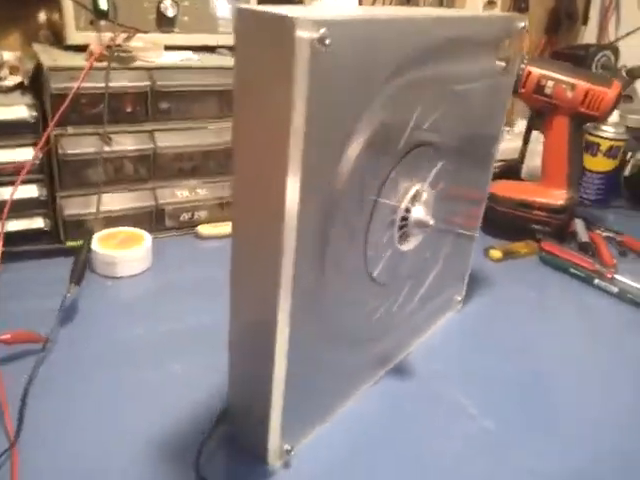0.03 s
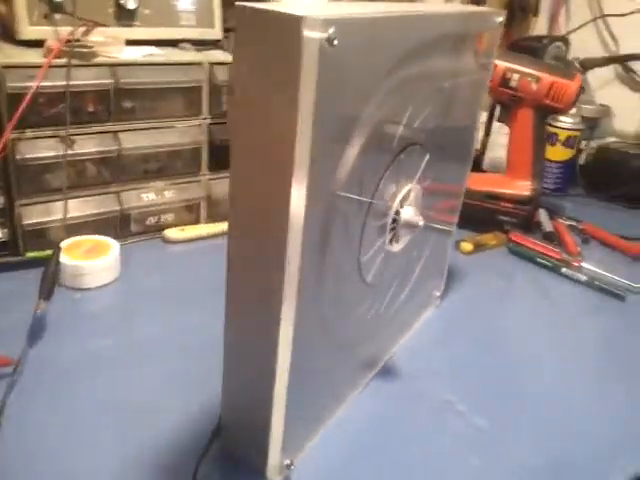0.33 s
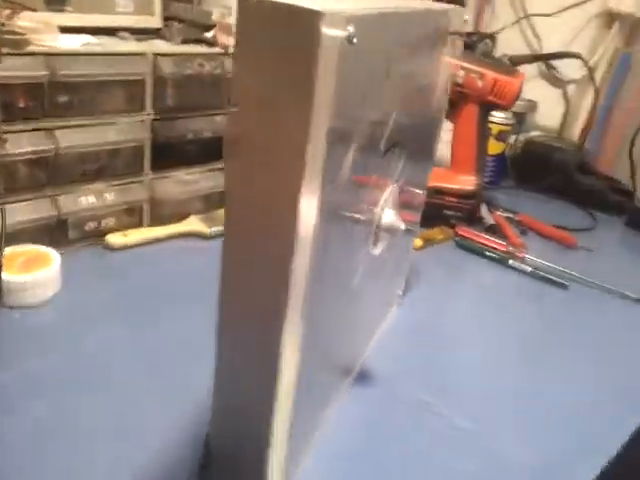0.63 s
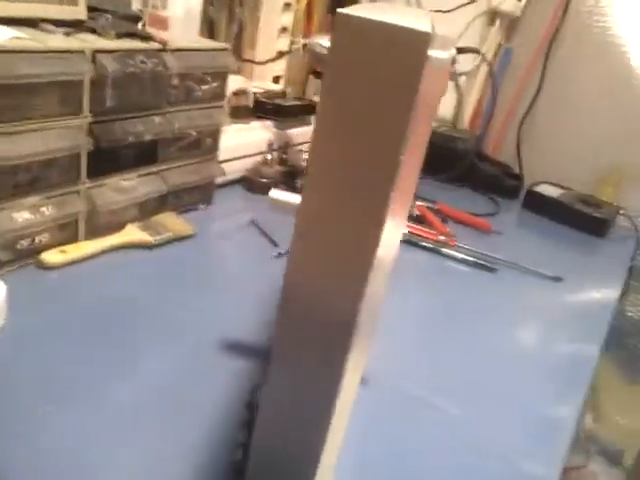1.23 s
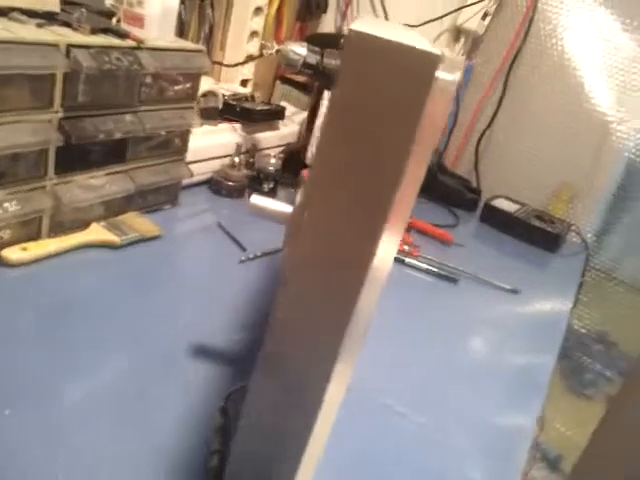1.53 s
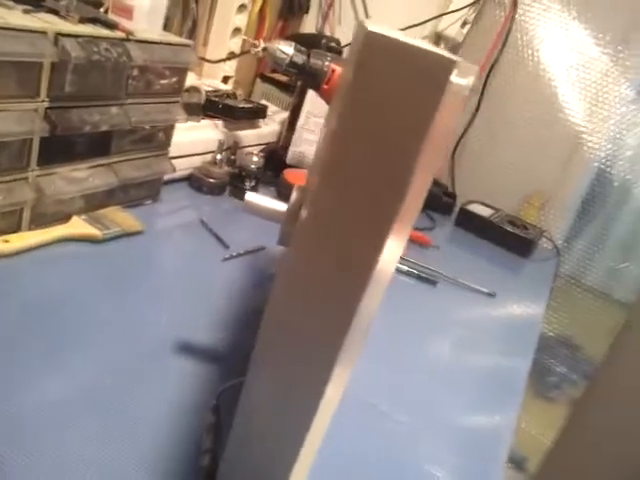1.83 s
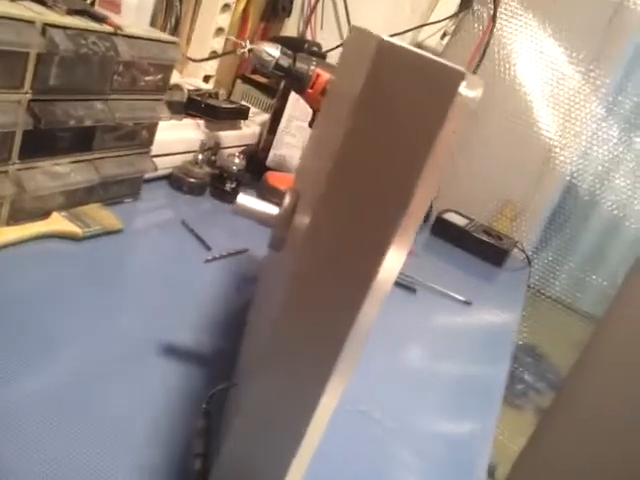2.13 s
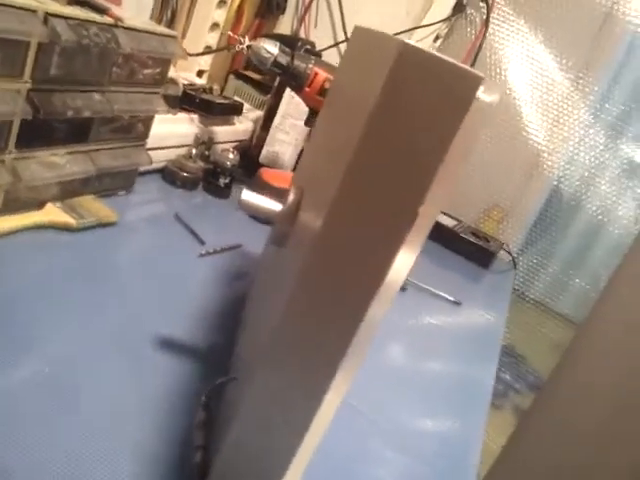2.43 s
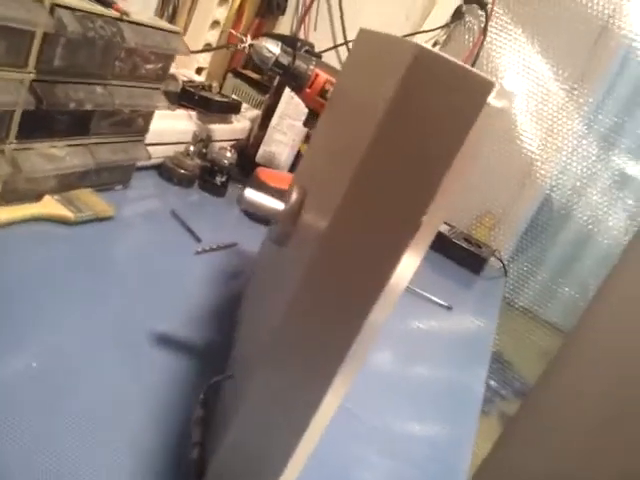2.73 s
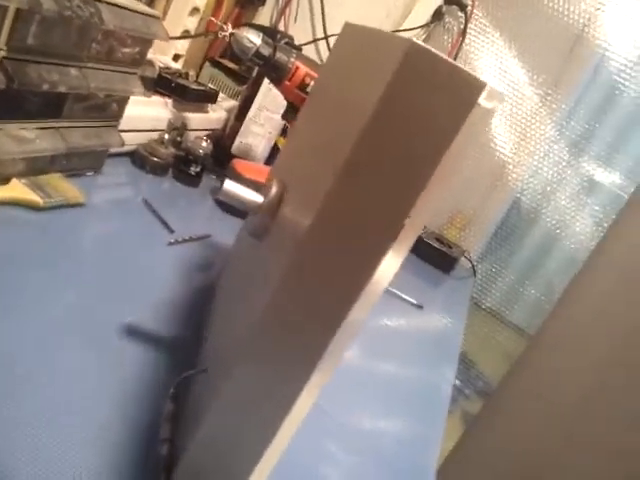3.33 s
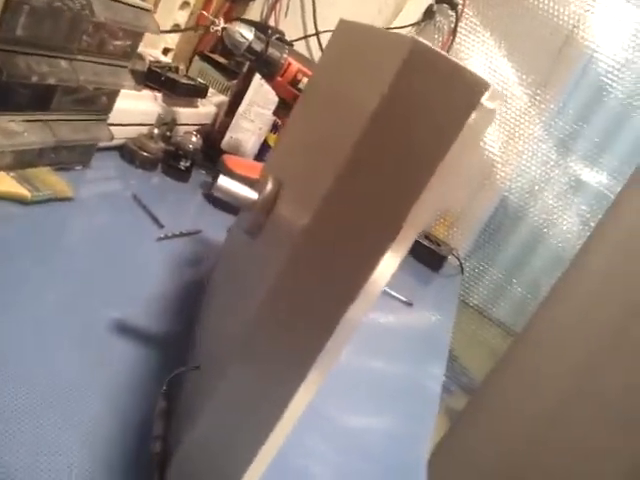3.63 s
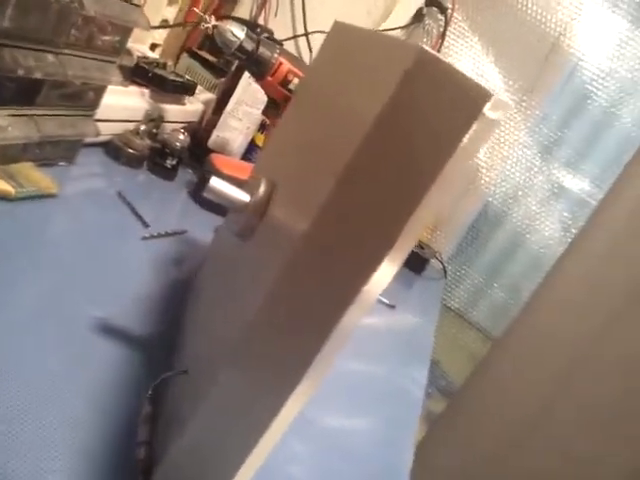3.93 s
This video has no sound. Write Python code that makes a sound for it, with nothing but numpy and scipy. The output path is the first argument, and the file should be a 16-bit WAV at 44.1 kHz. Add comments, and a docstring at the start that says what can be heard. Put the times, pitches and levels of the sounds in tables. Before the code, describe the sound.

A model turbine whirs steadily in a small workshop, with one brief dull knock.

```python
"""From the start, a model disc turbine spins steadily in a flat metal casing on a workshop bench.
Its shaft sings several tones over a rush of air, and a faint low hum lies underneath.
The microphone starts at the casing's face and passes its edge after about 1.2 seconds, so the
tones and the casing's resonances shift. At 1.6 seconds something knocks dully and rings briefly.
From about 2.5 seconds to the end, we hear the turbine from the back."""
import sys
import numpy as np
from scipy import signal
from scipy.fft import rfft, irfft, next_fast_len
from scipy.io import wavfile
from scipy.ndimage import uniform_filter1d, map_coordinates

SR = 44100
rng = np.random.default_rng(int(sys.argv[2]) if len(sys.argv) > 2 else 0)


def store_wav(level_fs):
    """Save 16-bit WAV to argv[1]."""
    pcm = np.round(np.clip(np.atleast_2d(level_fs), -1, 1) * 32767)
    wavfile.write(sys.argv[1], SR, pcm.T.astype(np.int16))


N = 176400  # 4 seconds

# How fast the rotor spins. Each row: time in seconds, turns per second.
ROTOR_SPEED = [(0, 140.95), (.5, 141.05), (1.05, 141.1), (1.3, 140.8), (1.85, 141.1), (2.5, 140.92),
               (4, 140.92)]
# The microphone's path. Each row: time in seconds, side (0 is the face, 1 the edge, 2 the back).
MIC_PATH = [(0, 0), (.5, 0.24), (1, 0.84), (1.6, 1.31), (2, 1.49), (2.5, 1.95), (4, 2.06)]
# The shaft's tones. Each row: multiple of the rotor speed, then level in dB at face, edge and back.
SHAFT_TONES = [(3, -52, -54.5, -52), (4, -43.5, -45, -46), (5, -46.5, -63.5, -57.5), (6, -66, -62, -60.5),
               (7, -63, -60.5, -55.5), (8, -54.5, -64, -62), (9, -54, -59, -57.5), (10, -61, -61.5, -57),
               (11, -44, -46.5, -41), (12, -46, -55.5, -64), (13, -51.5, -56, -52), (14, -54, -58, -57.5),
               (15, -47.5, -50.5, -49), (17, -50, -51, -57), (19, -64, -57.5, -53.5), (21, -53, -58, -52.5),
               (22, -71, -50.5, -55), (24, -66, -51, -53), (26, -57.5, -65.5, -65.5),
               (27, -55.5, -51.5, -54), (31, -50, -49.5, -53), (32, -53, -48, -48.5)]
# How loud the air is. Each row: time in seconds, level in dB.
AIR_LEVEL = [(0, -31.5), (.35, -31.5), (.7, -33), (1.5, -33), (2.3, -33), (3.2, -32.5), (4, -32)]
# The air's mix of low and high sound. Each row: frequency in Hz, relative level in dB.
AIR_SPECTRUM = [(25, -100), (65, -80), (120, -79.5), (210, -79), (330, -78.5), (480, -83), (600, -73.5),
                (655, -65.5), (720, -64.5), (775, -80), (910, -72), (1060, -82.5), (1340, -81), (1480, -72),
                (1600, -67), (1780, -68.5), (1930, -75.5), (2210, -67), (2320, -73), (3300, -72),
                (5200, -71.5), (6450, -73.5), (7000, -80.5), (7600, -89.5), (8200, -95), (9700, -99)]
# How the rotor pulses the air. Each row: pulses per turn, depth from 0 to 1.
AIR_PULSES = [(1, 0.03), (2, 0.09), (5, 0), (6, 0), (7, 0.09), (8, 0.11)]
# Pitches the casing boosts or weakens, each beamed one way. Each row: frequency in Hz, width in Hz,
# boost in dB (below zero weakens), side it aims at, beam width in sides.
CASING_BEAMS = [(1564, 57, 4, 2, .45), (1720, 150, 2.5, 0.084, 0.36), (2120, 120, 7, 0, 0.4),
                (2970, 250, 6, 1.05, 0.23), (2970, 280, 4.5, 0, 0.37), (3310, 170, -9.5, 0.59, 0.47),
                (3640, 130, 11, .03, .45), (4058, 314, 9.5, 1.85, 0.83), (4290, 280, 11.5, 0.21, .42),
                (4400, 130, 13.5, 1.245, 0.21), (4330, 100, 1.5, 1.9, .3), (4520, 86, 10.5, .75, 0.14),
                (4695, 170, 5.5, 2, 0.17), (4640, 130, -4, 0.37, .5), (4960, 60, 3, 1, .7),
                (5350, 170, 4, 2.3, .4), (5766, 260, 12, .2, 0.44), (5840, 190, 4.5, 1.9, .35),
                (6250, 160, 8.5, 2, 0.16), (6480, 150, 9, 1.4, 0.22)]
# The contacts that make up the knock. Each row: start in seconds, gain in dB, brightness in Hz.
KNOCK_CONTACTS = [(1.5887, -19.5, 490), (1.5975, -25, 1700), (1.6046, -27.5, 1110)]
# How the knocked thing rings. Each row: pitch in Hz, relative level in dB, seconds to fade by 60 dB.
KNOCK_RINGS = [(314, -11, 0.068), (329, -5, 0.12), (377, -14, 0.4), (391, -17, .25), (418, -3, 0.08),
               (501, -10, 0.28), (686, -6.5, 0.12), (880, -17, 0.057), (998, -10, 0.088),
               (1120, -13.5, 0.033), (1420, -14, 0.061)]
# The tones of the hum. Each row: pitch in Hz, level in dB, phase waver in radians.
HUM_TONES = [(47, -58, .6), (121.2, -64.5, .1)]


def shaft_tones(angle, side, gain_db=.5, flutter_rate=55):
    """The shaft sings at multiples of its speed; the higher tones flutter more than the low ones."""
    out = np.zeros(N)
    side_shares = np.maximum(0, 1 - np.abs(side - np.arange(3)[:, None]))  # blend face, edge and back
    for multiple, *side_db in SHAFT_TONES:
        flutter_db = .6 if multiple <= 4 else 1.7
        flutter = unit(amp(flutter_db * wobble(flutter_rate)))
        phase_drift = np.log(amp(flutter_db)) * wobble(flutter_rate) + rng.uniform(0, 2 * np.pi)
        level = amp(side_db) @ side_shares
        out += level * flutter * np.sin(round(multiple) * angle + phase_drift)
    return np.sqrt(2) * amp(gain_db) * out


def air_rush(angle, side, swell_db=.33):
    """The rotor pulses the air, and the casing colours it as the microphone crosses its beams."""
    pulses = 1 + sum(depth * np.cos(round(per_turn) * angle + rng.uniform(0, 2 * np.pi))
                     for per_turn, depth in AIR_PULSES)
    hiss = bench_echoes(patchy_noise(depth_db=1.5) * pulses)
    hz, t, bands = signal.stft(hiss, SR, nperseg=4096)  # split into bands, moment by moment
    hz = hz[:, None]
    mic_side = np.interp(t * SR, np.arange(N), side)
    boost_db = 0
    for centre, width, db, aim, spread in CASING_BEAMS:
        in_beam = np.exp(-((mic_side - aim) / spread) ** 2)
        boost_db += in_beam * db / (1 + (2 * (hz - centre) / width) ** 2)
    colour = amp(along(AIR_SPECTRUM, hz) + boost_db)
    colour /= np.linalg.norm(colour, axis=0)  # beams change the tone, not the overall level
    air = signal.istft(bands * colour, SR, nperseg=4096)[1][:N]
    return unit(air) * amp(curve(AIR_LEVEL) - swell_db * wobble(16))


def patchy_noise(depth_db):
    """The raw hiss of the air: white noise whose bands briefly swell and dip at random."""
    bands = signal.stft(rng.standard_normal(N), nperseg=512)[2]
    patches = uniform_filter1d(rng.standard_normal(bands.shape), size=6, axis=0)  # smooth across pitch
    patches = uniform_filter1d(patches, size=8, axis=1)  # and across time
    return signal.istft(bands * amp(depth_db * unit(patches)), nperseg=512)[1][:N]


def bench_echoes(x, count=8, gain_db=-13, treble_hz=930, far_delay_s=.02, slide_s=.000404):
    """Small things on the bench reflect the treble; the delays slide as the microphone moves."""
    treble = filtered(x, lambda hz: hz ** 2 / (hz ** 2 + treble_hz ** 2))
    side, echoes = curve(MIC_PATH), np.zeros(N)
    for distance, direction in rng.uniform(0, 1, (count, 2)):
        delay_s = far_delay_s * (.1 + .9 * distance) + slide_s * (2 * direction - 1) * side
        echoes += np.interp(np.arange(N) - delay_s * SR, np.arange(N), treble)
    return x + amp(gain_db) * echoes / np.sqrt(count)


def knock(thud_db=-9.5, thud_fade_s=.12, thud_low_hz=297, lowest_hz=285):
    """Three quick, soft contacts ring the same low notes, each with a toneless thud."""
    out, t = np.zeros(N + SR), np.arange(SR // 2) / SR
    ring = sum(amp(db - 60 * t / fade_s) * np.sin(2 * np.pi * hz * t) for hz, db, fade_s in KNOCK_RINGS)
    for start_s, db, bright_hz in KNOCK_CONTACTS:
        thud_high_hz = max(bright_hz, thud_low_hz * 2)
        band = signal.butter(2, [thud_low_hz, thud_high_hz], "bandpass", fs=SR, output="sos")
        noise = unit(signal.sosfilt(band, rng.standard_normal(len(t))))
        thud = noise * amp(thud_db - 60 * t / thud_fade_s)
        soften = signal.butter(2, bright_hz, fs=SR, output="sos")
        out[round(start_s * SR):][:len(t)] += amp(db) * (signal.sosfilt(soften, ring) + thud)
    # The knocked thing gives off no deep bass.
    low_cut = signal.butter(6, lowest_hz, "highpass", fs=SR, output="sos")
    return signal.sosfilt(low_cut, out[:N])


def workshop(x, fade_s=.25, echo_db=-9):
    """The small, cluttered room adds a short tail of echoes."""
    t = np.arange(SR // 2) / SR
    tail = rng.standard_normal(len(t)) * amp(-60 * t / fade_s)
    return x + amp(echo_db) * signal.fftconvolve(x, tail / np.linalg.norm(tail))[:N]


def hum(sway_db=.5):
    """Two faint, low tones waver a little in level and pitch."""
    out, t = np.zeros(N), np.arange(N) / SR
    for hz, db, waver in HUM_TONES:
        level = np.sqrt(2) * amp(db + sway_db * wobble(8.3))
        out += level * np.sin(2 * np.pi * hz * t + waver * wobble(1.3))
    return out


def amp(db):
    """Turn decibels into a number to multiply by."""
    return 10 ** (np.asarray(db) / 20)


def unit(x):
    """Scale a signal so that its average strength (rms) is 1."""
    return x / np.sqrt(np.mean(x ** 2) + 1e-20)


def along(points, hz):
    """Read between (Hz, value) points, on a scale of musical pitch."""
    point_hz, values = np.transpose(points)
    return np.interp(np.log(hz + 1), np.log(point_hz + 1), values)


def curve(rows):
    """Join (seconds, value) points with straight lines, one value per sample."""
    return np.interp(np.arange(N) / SR, *np.transpose(rows))


def wobble(rate):
    """A smooth curve through `rate` random points a second."""
    points = rng.standard_normal(int(N * rate / SR) + 4)
    return map_coordinates(points, [np.arange(N) * rate / SR + 1])


def filtered(x, response):
    """Multiply each frequency in x by the gain that `response` gives it."""
    size = next_fast_len(N + SR // 4)
    return irfft(rfft(x, size) * response(np.fft.rfftfreq(size, 1 / SR)), size)[:N]


def scene(jitter_hz=.06):
    """Turbine, knock and hum, the same in both channels."""
    turns_per_s = curve(ROTOR_SPEED) + jitter_hz * wobble(12)
    angle = 2 * np.pi * np.cumsum(turns_per_s) / SR  # how far the rotor has turned
    side = np.clip(curve(MIC_PATH), 0, 2)
    mono = air_rush(angle, side) + workshop(knock()) + hum() + shaft_tones(angle, side)
    return np.array([mono, mono])


def record(dry, top_hz=9900):
    """Cut away the highest treble."""
    return np.array([filtered(channel, lambda hz: hz < top_hz) for channel in dry])


dry = scene()
out = record(dry)
store_wav(out)
```